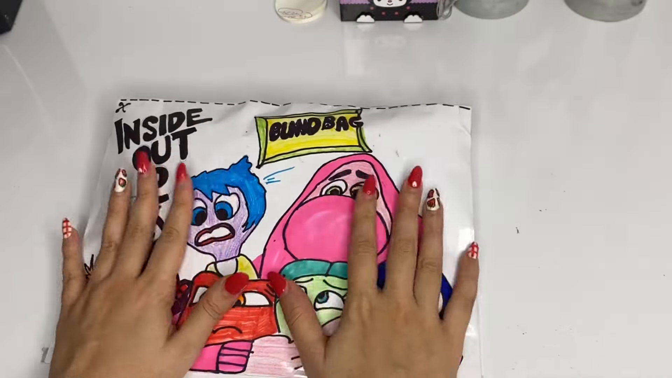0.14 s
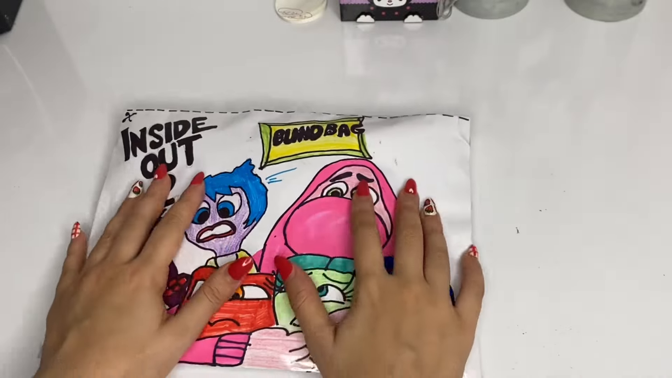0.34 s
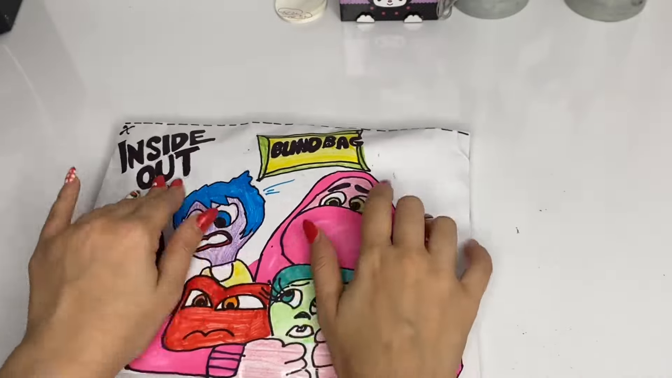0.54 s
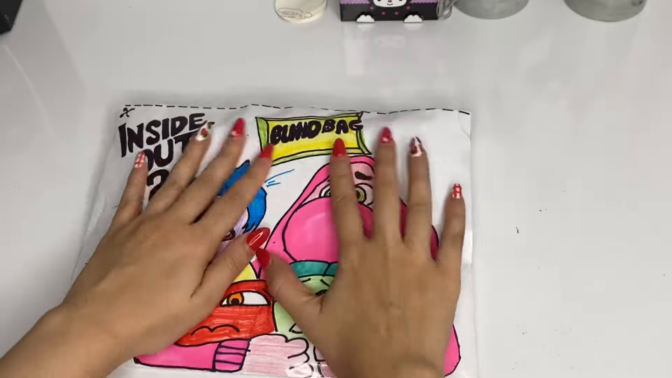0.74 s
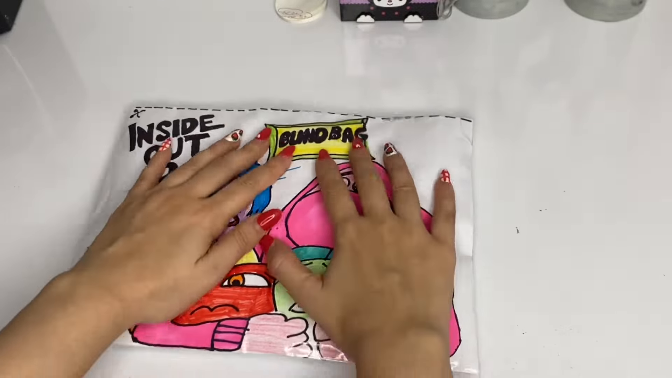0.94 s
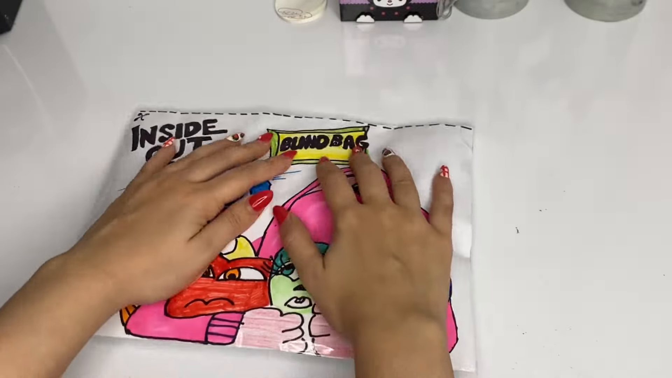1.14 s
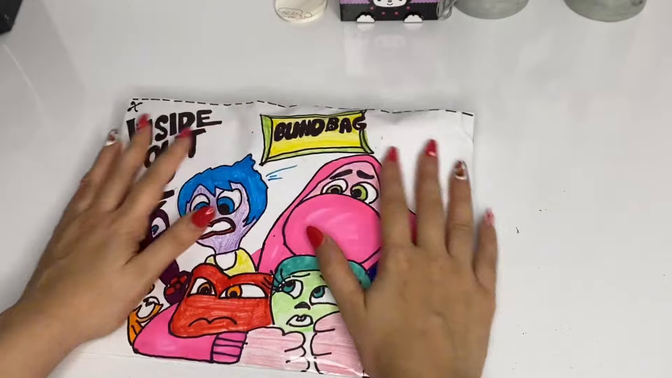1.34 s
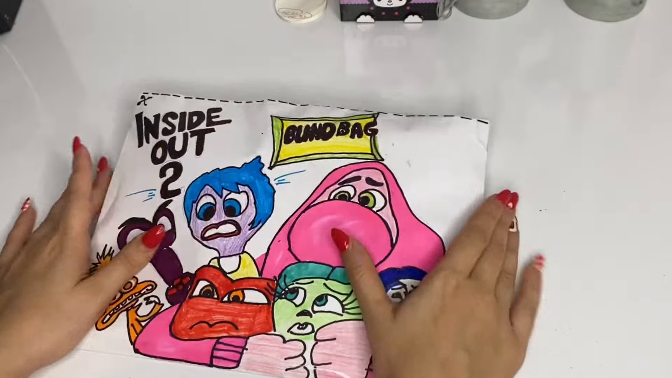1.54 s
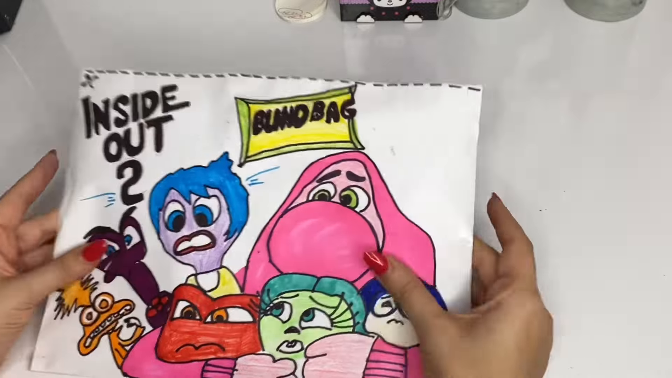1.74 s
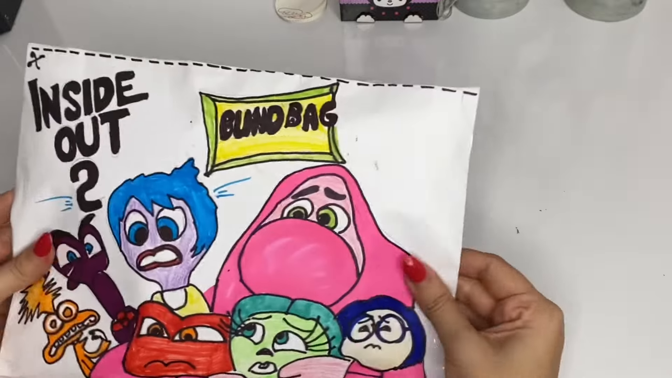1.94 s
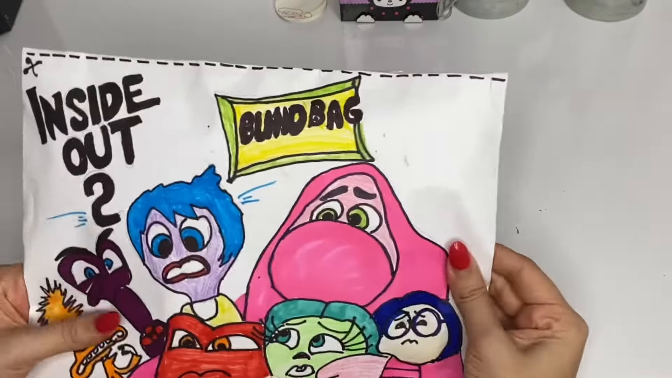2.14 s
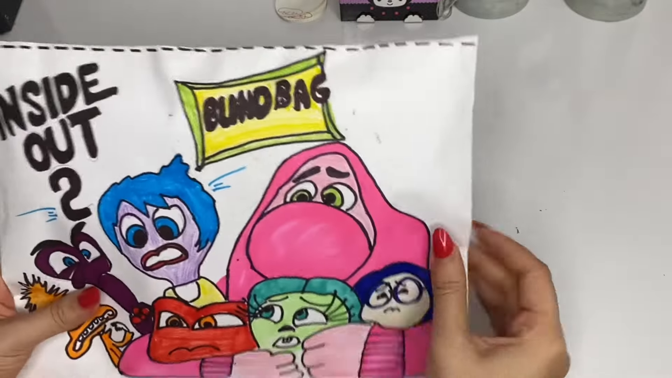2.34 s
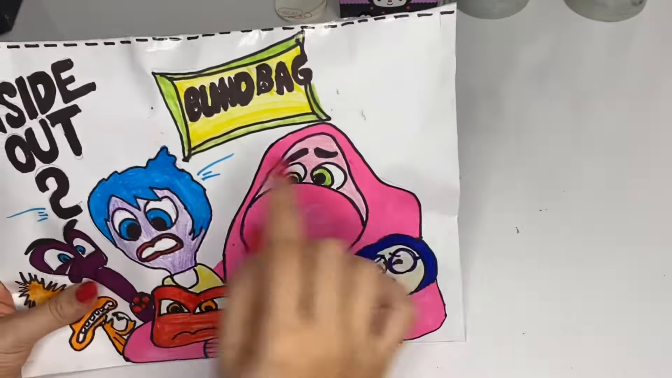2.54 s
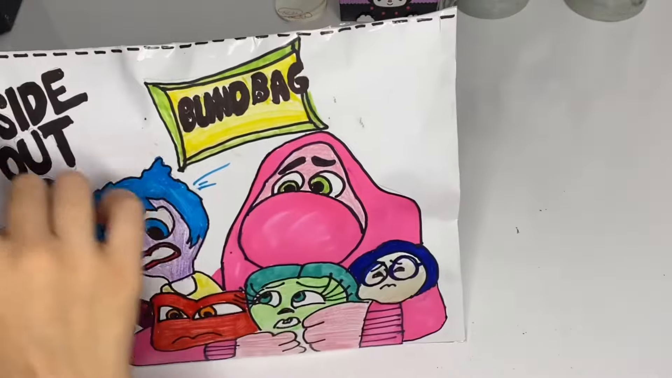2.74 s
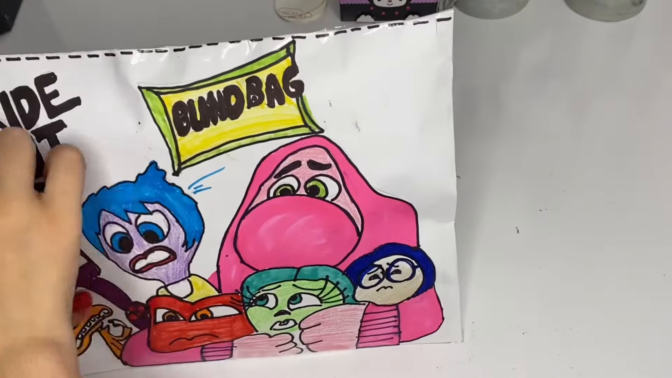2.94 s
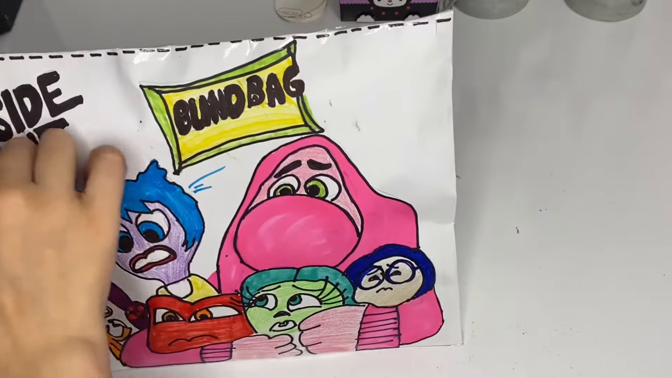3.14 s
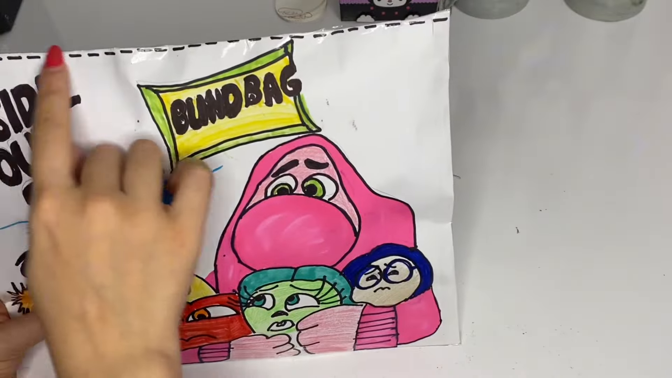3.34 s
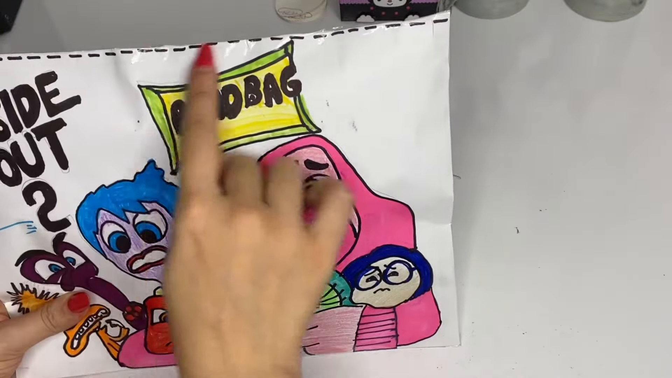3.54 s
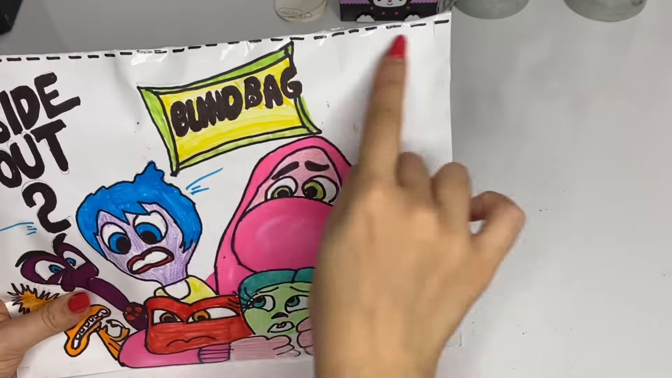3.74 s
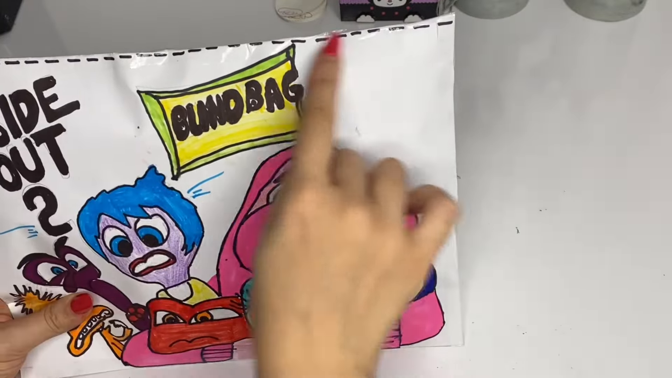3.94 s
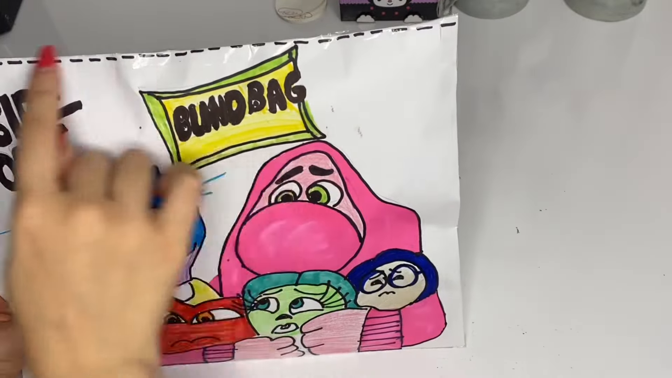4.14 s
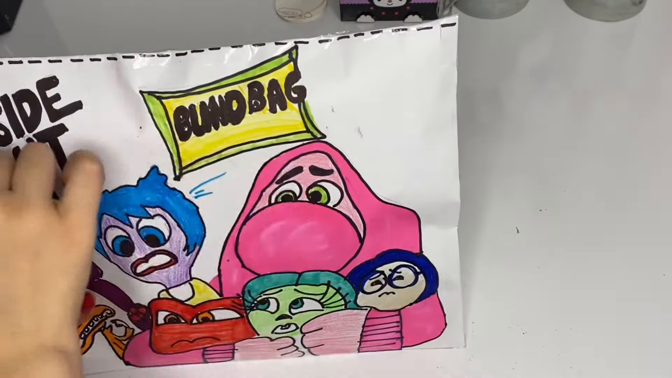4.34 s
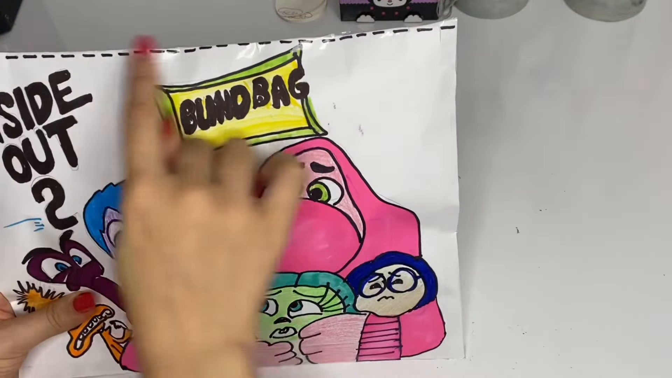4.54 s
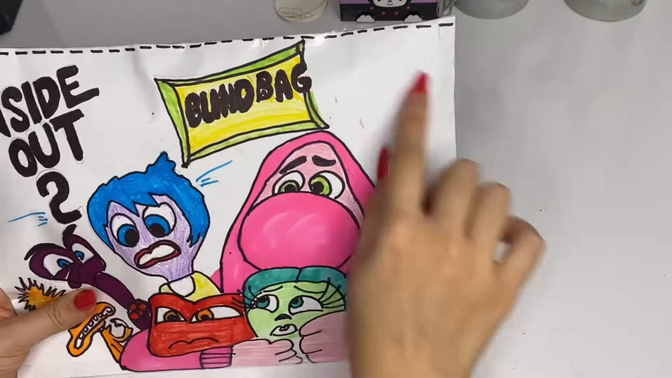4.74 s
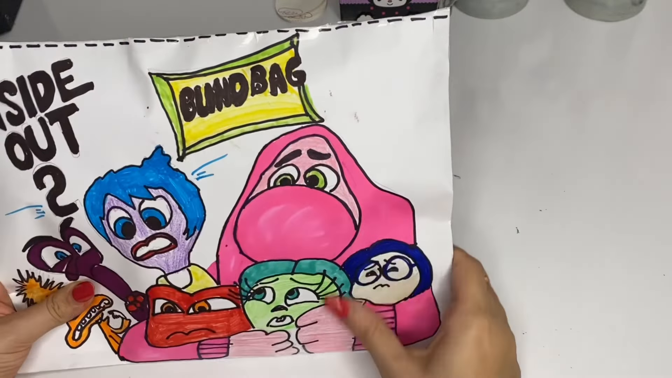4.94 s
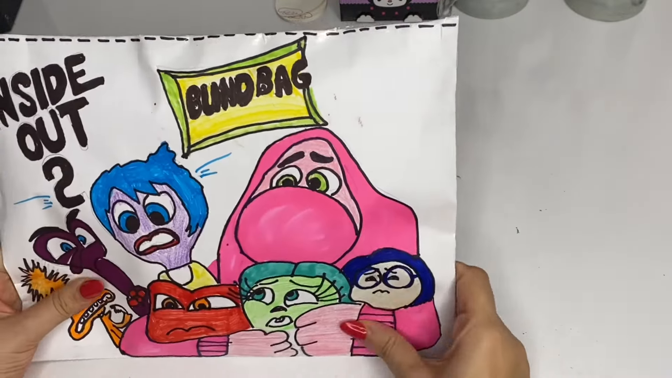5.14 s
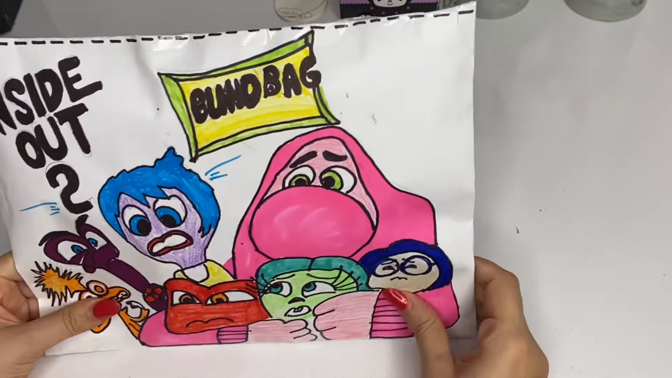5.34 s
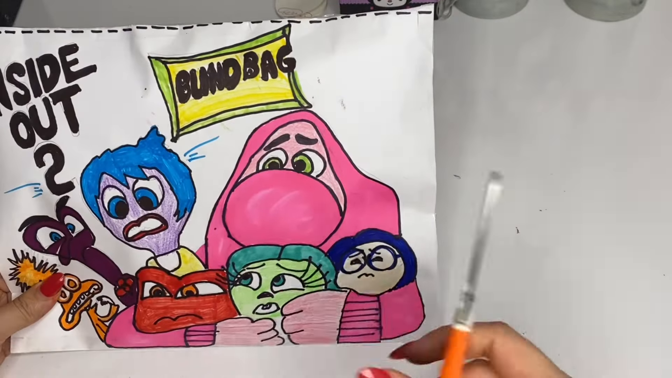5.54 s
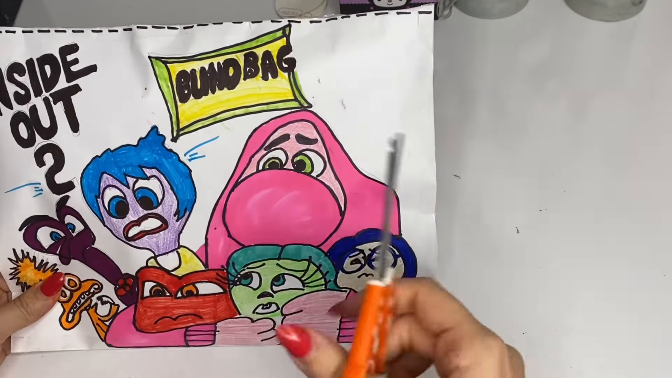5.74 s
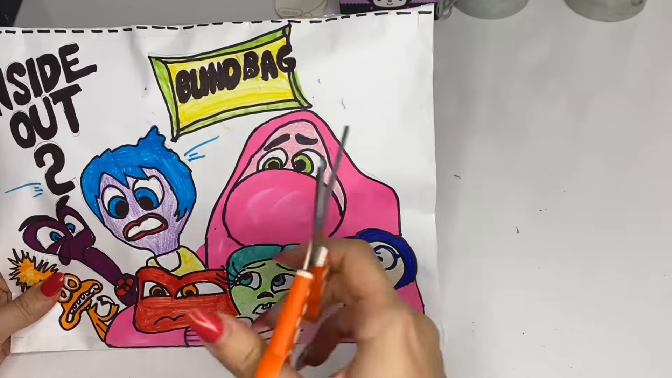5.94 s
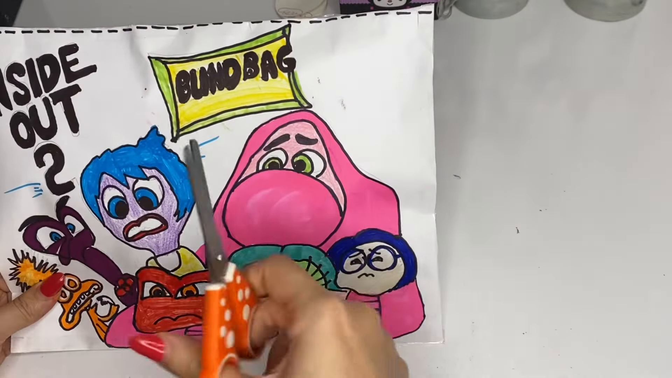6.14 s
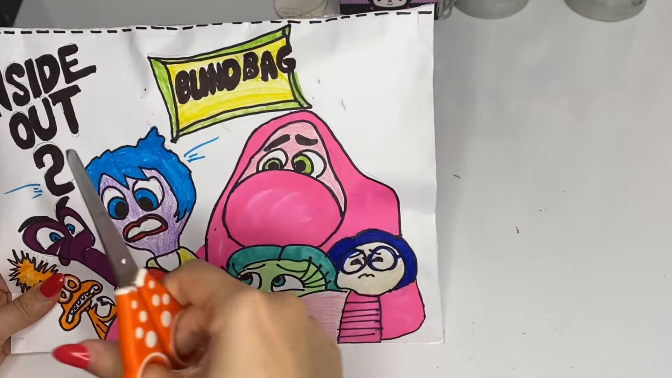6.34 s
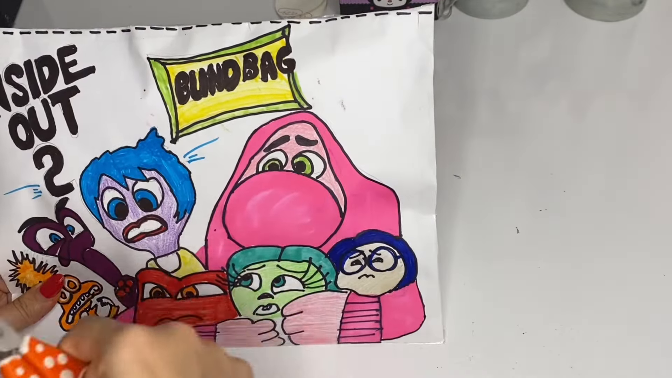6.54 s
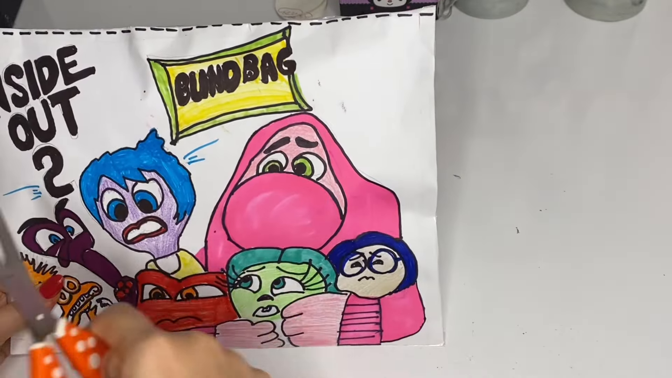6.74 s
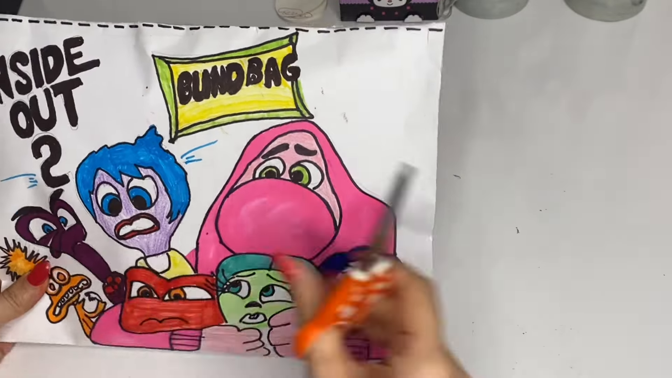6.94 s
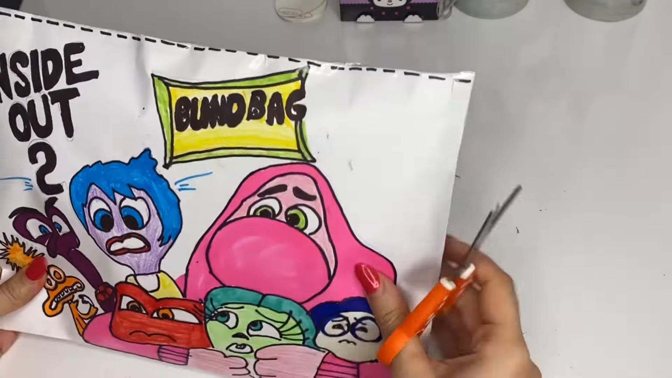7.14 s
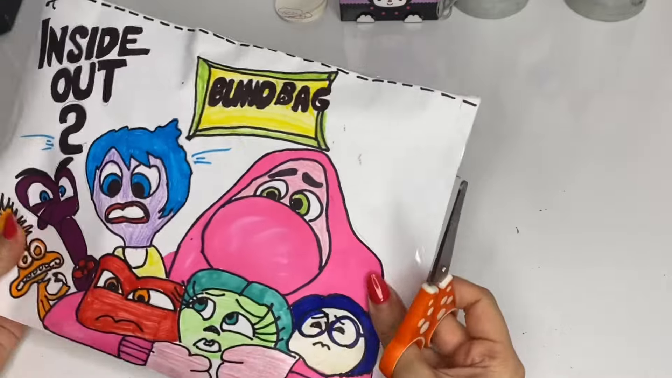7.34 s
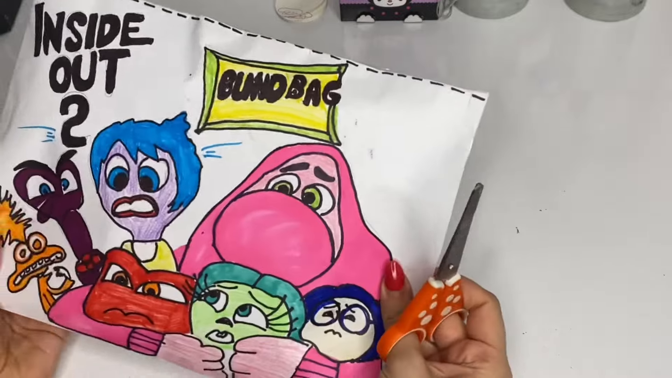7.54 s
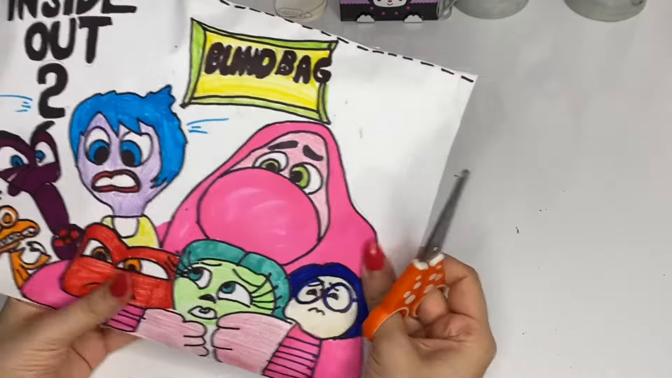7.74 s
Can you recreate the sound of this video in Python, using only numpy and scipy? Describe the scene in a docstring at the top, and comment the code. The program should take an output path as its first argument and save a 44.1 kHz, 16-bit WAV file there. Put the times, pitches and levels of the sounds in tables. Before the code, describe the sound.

Close, dry paper crinkles with sharp creases, soft hollow thuds and finger swishes, followed by six light metallic scissor snips and a last rustle.

```python
"""Paper bag and scissors.

Hands smooth, lift and turn a paper bag in a small room, close to a pair of microphone ports.
Creases snap as short noise bursts over a fine crackle of tiny grains; fingers hiss as filtered noise.
The hollow bag thuds as falling sine modes; later, scissors snip six times with clicks and a steel scrape."""
import sys
import numpy as np
from scipy import signal
from scipy.fft import rfft, irfft, next_fast_len
from scipy.io import wavfile
from scipy.ndimage import uniform_filter1d, map_coordinates

SR = 44100
rng = np.random.default_rng(int(sys.argv[2]) if len(sys.argv) > 2 else 0)


def store_wav(level_fs):
    """Save 16-bit WAV to argv[1]."""
    pcm = np.round(np.clip(np.atleast_2d(level_fs), -1, 1) * 32767)
    wavfile.write(sys.argv[1], SR, pcm.T.astype(np.int16))


N = 343539
TIME = np.arange(N) / SR  # seconds


def amp(db):
    """Decibels to gain."""
    return 10 ** (np.asarray(db) / 20)


def unit(x):
    """Scales to rms 1."""
    return x / np.sqrt(np.mean(x ** 2) + 1e-20)


def read(points, hz):
    """Interpolates a table on a logarithmic frequency axis."""
    f, value = np.transpose(points)
    return np.interp(np.log(hz + 1), np.log(f + 1), value)


def curve(rows):
    """Turns rows of seconds and dB into a gain at every sample."""
    return amp(np.interp(TIME, *np.transpose(rows)))


def add(mix, start_s, sound):
    """Mixes a stereo sound in at start_s."""
    part = mix[:, max(round(start_s * SR), 0):][:, :sound.shape[1]]
    part += sound[:, :part.shape[1]]


def colour(x, spectrum):
    """Filters by a spectrum table."""
    size = next_fast_len(x.shape[-1])
    gain = amp(read(spectrum, np.fft.rfftfreq(size, 1 / SR)))
    return irfft(rfft(x, size) * gain, size)[..., :x.shape[-1]]


def pan(left_db):
    """Left and right gains of constant power, left_db apart."""
    return unit(amp([[left_db / 2], [-left_db / 2]]))


def noise():
    """Stereo white noise over the whole scene, the channels unrelated."""
    return rng.standard_normal((2, N))


def flutter(per_s, depth_db):
    """A gain that wanders at random between 4096 knots, then holds."""
    knots = rng.standard_normal(4096)
    return amp(depth_db * np.interp(TIME * per_s, np.arange(len(knots)), knots))


def drifting(x, depth_db, span_hz, span_s):
    """Broad resonances come and go as the point of contact moves."""
    hz, frame_s, z = signal.stft(x, SR, nperseg=512)
    knots = rng.standard_normal((256, 512))
    grid = np.meshgrid(hz / span_hz, frame_s / span_s, indexing="ij")
    field = map_coordinates(knots, grid, order=3, mode="mirror")
    return signal.istft(z * amp(depth_db * field), SR, nperseg=512)[1][:, :N]


# Likeness of the two ports. Each row: frequency in Hz, likeness from 0 to 1.
PORT_LIKENESS = [(50, 0.91), (200, 0.97), (500, 0.88), (1500, 0.4), (5000, 0.01), (9000, 0.9), (16000, 0.7)]


def ports(pair, lag_s=0):
    """Makes two unrelated signals partly alike, the right one arriving lag_s earlier."""
    size = next_fast_len(pair.shape[1])
    hz = np.fft.rfftfreq(size, 1 / SR)
    left, other = rfft(pair, size)
    same = np.clip(read(PORT_LIKENESS, hz), 0, 1)
    right = same * left + np.sqrt(1 - same ** 2) * other
    right = right * np.exp(2j * np.pi * hz * lag_s)
    return irfft(np.array([left, right]), size)[:, :pair.shape[1]]


def burst(spectrum, rise_s, decay_s, lag_s=0, size=2048, lead_samples=192, smooth_bins=81):
    """A few ms of dense ringing, with the energy of 5 ms at rms 1, that swells around lead_samples."""
    t = (np.arange(size) - lead_samples) / SR
    shape = np.exp(-np.logaddexp(-t / rise_s, t / decay_s))
    z = rfft(rng.standard_normal((2, size)) * shape)
    # one sudden release feeds all pitches alike, so broad holes are evened out
    z /= np.sqrt(uniform_filter1d(np.abs(z) ** 2, smooth_bins, axis=1) + 1e-20)
    x = colour(ports(irfft(z, size), lag_s), spectrum)
    return x / np.sqrt((x ** 2).sum(1, keepdims=True) / (.005 * SR))


# Modes of the struck panel. Each row: multiple of its pitch, relative level in dB per Hz before focus.
PANEL_KNOCK = [(.12, -19.5), (.36, -9), (.6, -9.5), (.8, -2.5), (1, 1.5), (1.25, -4), (1.7, -11.5),
               (2.8, -31), (6, -56.5)]
# Crack spectrum. Each row: frequency in Hz, relative level in dB per Hz.
CRACK_SPECTRUM = [(300, -31.5), (700, -6.5), (1050, -3.5), (1600, 4), (2600, -3), (3600, -11.5),
                  (7000, -47.5), (16000, -48.5)]


def clicks(rows, treble, knock_s, crack_s, treble_s, rise_s, lead_s, octave_db, side_db, scatter_db):
    """Each click sums a knock of the panel, a crack and a treble tick, each with its own decay."""
    out = np.zeros((2, N))
    for s, db, knock_db, treble_db, panel_hz in rows:
        lag_s = rng.normal(0, .00006)  # the low parts spread from all over the surface
        # a soft, dull knock is mostly the panel's main mode; a sharp one shakes all of them
        focus = np.clip(knock_db / 9, 1, 2.2)
        panel = np.array(PANEL_KNOCK) * [panel_hz, focus]
        # a gentler release is slower: its treble is lower as well as weaker
        tick_spectrum = np.array(treble) * [2 ** (min(treble_db, 0) / octave_db), 1]
        knock = amp(knock_db) * burst(panel, rise_s, knock_s, lag_s)
        crack = burst(CRACK_SPECTRUM, rise_s, crack_s, lag_s)
        tick = amp(treble_db) * burst(tick_spectrum, rise_s, treble_s)
        # brighter clicks lean further to the left
        left_db = side_db + .35 * treble_db + scatter_db * rng.standard_normal()
        add(out, s - lead_s, amp(db) * pan(left_db) * (knock + crack + tick))
    return out


# Loudest creases. Each row: time in seconds, crack level in dB before the trim, knock re crack in dB,
# treble re crack in dB, panel pitch in Hz.
CREASE_SNAPS = [(0.0135, -48.5, 0.5, -16, 694), (0.0775, -56, 21, -6, 830), (0.092, -53.5, 8.5, -15.5, 620),
                (0.1465, -49.5, 3, -11.5, 800), (0.1614, -41.5, 3.5, -4, 726), (0.1787, -39.5, 5.5, 0, 870),
                (0.1964, -34.5, 1.5, 5, 746), (0.2682, -51, 3.5, 4.5, 700), (0.2864, -40, -6.5, -15, 694),
                (0.3440, -38.5, 1.5, 4.5, 950), (0.3568, -31, 2.5, 0, 910), (0.400, -45, 4.5, -13, 700),
                (0.4358, -34.5, -3.5, -8.5, 830), (0.5103, -44, 5, -10, 640), (0.5365, -44, 0.5, -12, 895),
                (0.5494, -40, 0, -10, 810), (0.5578, -40.5, 2.5, -7, 830), (0.5888, -47.5, 6, -7, 776),
                (0.667, -47.5, 4, -9, 710), (0.698, -32, -1.5, -5.5, 827), (0.7114, -34.5, 0.5, -8, 830),
                (0.8445, -38.5, 3, -3.5, 830), (0.8619, -43.5, 7, -15.5, 790), (0.9078, -44, 3.5, 6.5, 870),
                (0.9182, -44, -7.5, 6.5, 680), (0.9396, -27, -2.5, 6, 614), (0.9822, -31, 0.5, -8, 582),
                (1.004, -41, 4.5, 3.5, 547), (1.0365, -37, -8.5, -17.5, 675), (1.075, -54.5, 3, 0.5, 700),
                (1.1371, -29.5, -4.5, 1.5, 686), (1.1851, -42, -12, 12.5, 750),
                (1.2115, -40.5, -1, -8.5, 633), (1.2208, -40, -6, -5, 750), (1.2308, -33, -6.5, -5.5, 830),
                (1.2635, -37, 8, -3, 650), (1.2977, -31.5, 3, -2.5, 680), (1.3045, -30.5, -2.5, -2, 740),
                (1.326, -31.5, -0.5, -2.5, 670), (1.3345, -29.5, -5, -7.5, 624),
                (1.4335, -40, -8.5, -2, 704), (1.4435, -34.5, -9, 2, 650), (1.4912, -38, 0, -20, 700),
                (1.580, -51, 3.5, 5.5, 615), (1.6285, -36, -11.5, 2.5, 820), (1.6395, -33, -1, -16.5, 850),
                (1.6470, -29, 3, -5, 900), (1.6685, -43, 13.5, -1.5, 664), (1.7502, -36.5, 2.5, -2, 770),
                (1.7684, -35, 8, -3, 810), (1.7767, -38, 7.5, 1.5, 655), (1.8182, -36, 2.5, 6.5, 850),
                (1.847, -45.5, 3, -6, 800), (1.8992, -47, 2.5, -13, 800), (1.9355, -46.5, 4.5, -10, 846),
                (1.96, -32.5, 1.5, 1.5, 900), (2.0049, -40, -4, -5, 900), (2.1219, -48.5, 9.5, -4.5, 797),
                (2.150, -52.5, 9.5, -12, 850), (2.1858, -34.5, 2.5, -2, 950),
                (2.196, -43.5, 12.5, -15.5, 673), (2.288, -49.5, 4, -14, 900),
                (2.3018, -37.5, 4.5, -2, 1003), (2.3921, -49.5, -4, -10.5, 540), (2.483, -62, 9, -15, 900),
                (2.5054, -61, 11, -16, 636), (2.5818, -38, -1, -4, 678), (2.6441, -50.5, 3.5, -1.5, 647),
                (2.6895, -61.5, 14, -4, 647), (2.99, -68, 16.5, -10, 738), (3.2995, -73.5, 25, -8.5, 620),
                (3.5038, -53, -1, -2, 620), (3.5758, -31, 6.5, -4, 740), (3.614, -48, 6, -5, 800),
                (3.7114, -43, 3, -18, 520), (3.747, -33, -8.5, -2.5, 790), (3.8355, -47, -17.5, -13, 845),
                (3.8779, -26, -2, -2.5, 802), (4.0368, -38.5, 9, -19.5, 770), (4.154, -71, 18.5, -2, 740),
                (4.303, -64, 4, -2.5, 698), (4.428, -65.5, 1, 15, 705), (4.458, -54, 15.5, -7, 575),
                (4.5332, -41, 4, -3, 435), (4.5625, -42.5, 9, -1, 656), (4.572, -45.5, 4, -7, 600),
                (4.6013, -38.5, 5.5, 0.5, 593), (4.6192, -28, 7, -10.5, 620), (4.7224, -39, 2, -10.5, 780),
                (4.7395, -28.5, -0.5, -13, 896), (4.815, -51, 4, -11, 556), (4.8887, -62.5, 15.5, -7, 830),
                (5.0515, -35.5, 1.5, -11, 880), (5.081, -52, 9, -8.5, 640), (5.1262, -50.5, 3.5, -7, 616),
                (5.1902, -41.5, 1.5, -5.5, 890), (5.2965, -54.5, 8, -1.5, 620), (5.4242, -49, 4.5, -1, 650),
                (6.905, -57.5, 4.5, -1, 860), (6.953, -49.5, -5, -7.5, 690), (6.975, -57.5, 17, -13, 750),
                (7.1725, -53.5, 20.5, -1, 834), (7.2446, -47.5, 6, -8.5, 626), (7.2785, -48.5, 6, -16, 670),
                (7.3043, -37.5, -4, -10.5, 676), (7.3118, -41, 2.5, 4, 610), (7.3666, -24, -3.5, -6.5, 760),
                (7.400, -50.5, -3, 7, 700), (7.4842, -65, 15, -7, 780), (7.7346, -30.5, 2, -1.5, 920),
                (7.7861, -34, 9, 8.5, 970)]
# Paper treble. Each row: frequency in Hz, relative level in dB per Hz.
PAPER_TREBLE = [(1200, -38), (2300, -18), (3000, 4), (5200, 2.5), (7000, -4), (10000, -8), (16000, -24.5)]


def snapping():
    """Creases release suddenly and knock the paper panels around them."""
    return amp(-1.0) * clicks(CREASE_SNAPS, PAPER_TREBLE, knock_s=0.003, crack_s=0.0015, treble_s=0.0019,
                              rise_s=0.00058, lead_s=.0036, octave_db=35.5, side_db=2.5, scatter_db=3.0)


# Hands smooth the bag, grip and lift it, trace its top edge, change grip, then turn it to the scissors.
# Each row: start, speeding up, steady and slowing in seconds, then skin hiss and paper crackle in dB
# at full speed, before the trims.
HAND_MOVES = [ (-0.1, 0.31, 0.028, 0.21, -58, -46.5), (0.32, 0.018, 0.22, 0.15, -56, -48.5),
              (0.56, 0.12, 0.011, 0.2, -49, -44.5), (0.83, .12, 0.029, 0.19, -55.5, -43),
              (1.12, 0.086, 0.086, 0.37, -43, -37.5), (1.56, 0.065, 0.028, 0.14, -53, -44.5),
              (1.72, 0.022, 0.063, 0.26, -54, -46), (1.84, 0.095, 0.093, 0.066, -62, -52.5),
              (2.0, 0.091, 0.012, 0.1, -53.5, -60.5), (2.14, 0.048, 0.052, 0.28, -64.5, -49.5),
              (2.558, 0.027, 0.033, 0.11, -82, -58.5), (2.93, 0.048, 0.011, 0.053, -76, -60),
              (2.98, 0.51, 0.21, 0.13, -54.5, -59.5), (3.672, .012, .04, 0.042, -69.5, -48.5),
              (3.81, 0.063, 0.16, 0.12, -56, -63), (4.26, 0.32, 0.18, 0.18, -53, -52),
              (4.91, 0.03, 0.17, 0.223, -62.5, -53.5), (5.15, 0.096, 0.017, 0.22, -58, -63),
              (5.34, 0.044, 0.078, 0.052, -66, -56), (6.8, 0.072, 0.25, 0.13, -68.5, -62.5),
              (7.14, 0.11, 0.047, 0.47, -54, -50.5), (7.541, 0.12, 0.11, .1, -48.5, -57)]
EASE = 1.71  # loudness grows as this power of the hand's speed


def hands():
    """Movements speed up, hold and slow; returns levels for sliding skin and for worked paper."""
    power = np.zeros((2, N))
    for start, rise_s, hold_s, fall_s, hiss_db, crackle_db in HAND_MOVES:
        corners = start + np.cumsum(np.abs([0, rise_s, hold_s, fall_s]))
        moving = (TIME > corners[0]) & (TIME < corners[-1])
        speed = np.interp(TIME[moving], corners, [0, 1, 1, 0])
        power[:, moving] += (amp([[hiss_db], [crackle_db]]) * speed ** EASE) ** 2
    return np.sqrt(power)


TINT_DB = 6  # standard deviation of each grain's own colouring


def crackle(work, spectrum, per_s, spread_db, grain_s, kinds=40):
    """Tiny creases ring briefly, each kind at its own pitch; hard work makes them crowd together."""
    chance, size, kind = rng.random(N), rng.exponential(1, N), rng.integers(0, kinds, N)
    crowding = np.clip(work / amp(-46), 1, 1.5)
    happens = chance < per_s * crowding / SR
    train = happens * amp(spread_db * np.minimum(size, 2.1)) / np.sqrt(crowding)
    hz, db = np.transpose(spectrum)
    tints = TINT_DB * rng.standard_normal((kinds, len(hz)))
    grains = []
    for scale, tint in zip(np.geomspace(.6, 1.6, kinds), tints):
        tinted = np.transpose([hz * scale, db + tint])
        grains.append(burst(tinted, grain_s / 4, grain_s, rng.normal(0, .00012)))
    out = np.zeros((2, N))
    for at in np.flatnonzero(train):
        add(out, at / SR, train[at] * grains[kind[at]])
    return unit(out) * work


# Crease spectrum before pitch scaling and tint. Each row: frequency in Hz, relative level in dB per Hz.
CREASE_SPECTRUM = [(100, -27.5), (270, -1.5), (400, -0.5), (620, 3), (900, 1), (1700, -6), (2800, -15.5),
                   (5000, -19.5), (8000, -31), (16000, -45)]
# Uneven breaking of stiff paper: wanderings per second, depth in dB.
CREASE_CLUMPS = (33, 1.6)


def creasing(work):
    """Stiff paper breaks unevenly under the hand."""
    uneven = work * flutter(*CREASE_CLUMPS)
    return amp(-3.0) * crackle(uneven, CREASE_SPECTRUM, per_s=240, spread_db=6.5, grain_s=.0011)


# Wrinkle spectrum before pitch scaling and tint. Each row: frequency in Hz, relative level in dB per Hz.
WRINKLE_SPECTRUM = [(300, -21.5), (1250, -8.5), (1700, 1.5), (2200, -6), (6000, -12), (16000, -30.5)]


def wrinkling(work, stroke):
    """Where a hand both presses and slides, wrinkles give way in a finer crackle."""
    both = np.sqrt(work * stroke)
    return amp(-9.0) * crackle(both, WRINKLE_SPECTRUM, per_s=210, spread_db=7.5, grain_s=.0008)


def bending(x, travel_s, crack_hz):
    """Bending waves cross the sheet faster the higher they are: the tick arrives first, the knock last."""
    size = next_fast_len(N + SR // 4)
    hz = np.fft.rfftfreq(size, 1 / SR)
    turns = travel_s * (2 * np.sqrt(crack_hz * hz) - hz)
    return irfft(rfft(x, size) * np.exp(-2j * np.pi * turns), size)[:, :N]


# Lasting resonances of the hollow bag. Each row: frequency in Hz, gain at resonance in dB re the sheet.
HOLLOW_MODES = [(245, -2), (559, -7.5), (611, -1), (860, -11.5), (1104, -10.5), (1265, -9.5), (1469, -9)]


def hollow(x, width_hz):
    """The sheet drives the lasting resonances of the bag."""
    t = np.arange(SR // 4) / SR
    modes = sum(amp(db) * np.cos(2 * np.pi * hz * t) for hz, db in HOLLOW_MODES)
    ring = modes * np.exp(-np.pi * width_hz * t) * 2 * np.pi * width_hz / SR
    return x + signal.oaconvolve(x, ring[None], axes=1)[:, :N]


# Skin on paper. Each row: frequency in Hz, relative level in dB per Hz.
SLIDE_SPECTRUM = [(300, -8.5), (1000, -6), (3700, -3.5), (4700, -2), (7000, -3), (10000, 0), (12000, -3.5),
                  (16000, -7)]


def sliding(stroke, grit_db, scratch_db):
    """Skin catches on paper fibres: a hiss and a scrape of shifting colour follow the hand's speed."""
    fibres = noise() * flutter(per_s=490, depth_db=grit_db) * flutter(per_s=40, depth_db=2.0)
    catches = noise() * flutter(per_s=700, depth_db=3) * flutter(per_s=30, depth_db=3)
    fibres = drifting(fibres, depth_db=1.8, span_hz=450, span_s=.09)
    catches = drifting(catches, depth_db=3.8, span_hz=420, span_s=.09)
    hiss = unit(colour(ports(fibres), SLIDE_SPECTRUM))
    scratch = amp(scratch_db) * unit(colour(ports(catches), PAPER_TREBLE))
    return amp(0.5) * pan(.4) * (hiss + scratch) * stroke


# Belly popping in or out. Each row: time in seconds, level in dB before thud_db, settled pitch in Hz,
# rise in seconds.
BELLY_THUDS = [(1.307, -32.5, 154.4, .005), (1.335, -31.5, 147.6, .005), (1.381, -28, 149.6, .003),
               (1.521, -32, 158, 0.0024), (2.189, -44, 180, .004), (2.502, -44.5, 137.7, .006),
               (2.539, -51.5, 153, 0.0045), (4.915, -31.5, 114.7, 0.015), (4.949, -34, 142.2, 0.0073),
               (7.17, -41.5, 138, .002), (7.209, -46.5, 165, 0.0017)]
# Swaying of the whole bag. Each row: time in seconds, level in dB before sway_db.
SWAY_LEVEL = [(0.0, -66), (0.06, -61), (1.02, -61), (1.19, -66.5), (1.34, -53), (2.13, -62), (2.75, -63),
              (2.84, -86.5), (2.93, -70), (3.55, -64.5), (4.25, -65.5), (5.03, -56), (5.16, -62),
              (5.47, -54.5), (5.53, -74.5), (6.79, -74), (7.62, -60.5), (7.79, -58.5)]
# Air pushed by the bag. Each row: frequency in Hz, relative level in dB per Hz.
SWAY_SPECTRUM = [(15, -47.5), (28, -28), (42, -4.5), (62, 6), (82, -5.5), (115, 4.5), (170, -7.5),
                 (260, -8), (450, -29), (1000, -57)]


def flexing(ring_s, thud_db, sway_db, sharp, settle_s, push_db, push_s):
    """The bag pushes air as it sways, and booms briefly when its belly pops."""
    out = amp(sway_db) * unit(colour(ports(noise()), SWAY_SPECTRUM)) * curve(SWAY_LEVEL)
    t = np.arange(SR // 4) / SR
    for s, db, hz, rise_s in BELLY_THUDS:
        # the taut face starts sharp and sinks as it slackens; its highest mode dies soonest
        turn = 2 * np.pi * np.cumsum(hz * (1 + sharp * np.exp(-t / settle_s))) / SR
        belly = np.sin(turn) + 0.29 * np.sin(0.72 * turn) + 0.2 * np.sin(1.2 * turn)
        push = amp(push_db) * np.sin(1.77 * turn) * np.exp(-t / push_s)
        boom = (belly * np.exp(-t / ring_s) + push) * (1 - np.exp(-t / rise_s))
        add(out, s, amp(db + thud_db) * np.array([boom, boom]))
    return out * pan(-2.0)


# Blades meeting. Each row: time in seconds, crack level in dB before the trims.
BLADE_SHUTS = [(5.5745, -49), (5.799, -48), (6.031, -46), (6.2721, -50.5), (6.481, -46.5), (6.8106, -48.5)]
# Shared by every snip: knock re crack in dB, treble re crack in dB, pivot pitch in Hz.
SNIP_CLICK = (-6.5, 7.9, 840)
# Blade treble. Each row: frequency in Hz, relative level in dB per Hz.
BLADE_TREBLE = [(1200, -27), (2500, 2), (3200, -5), (3800, 8), (4800, 7), (5700, 0.5), (7200, -2.5),
                (10500, -4.5), (16000, -14)]


def snipping():
    """Blades clack together and knock the pivot."""
    rows = [(*row, *SNIP_CLICK) for row in BLADE_SHUTS]
    return amp(3.0) * clicks(rows, BLADE_TREBLE, knock_s=0.0062, crack_s=0.0022, treble_s=0.0014,
                             rise_s=0.00018, lead_s=.0038, octave_db=36, side_db=0.5, scatter_db=-2.0)


# Blades parting. Each row: time in seconds, level in dB.
BLADE_OPENS = [(5.677, -57), (5.903, -55.5), (6.156, -56.5), (6.379, -65.5), (6.622, -58.5), (7.167, -52)]
# Steel on steel. Each row: frequency in Hz, relative level in dB per Hz.
STEEL_SPECTRUM = [(500, -15), (1500, -14), (3000, -11), (4200, -4.5), (5800, -4), (7100, 1), (8400, -4),
                  (10000, 0), (11600, -3.5), (13200, -5), (14800, -10), (16000, -7.5)]


def blades(closing_db, swell_s, opening_s):
    """Steel slides on steel: a scrape swells until the blades meet; they part with a tick and a swish."""
    level = np.zeros(N)
    for s, db in BLADE_SHUTS:
        t = TIME - s + 0.0027
        level += amp(db + closing_db) * np.exp(-np.abs(t) / np.where(t < 0, swell_s, .007))
    for s, db in BLADE_OPENS:
        t = np.maximum(TIME - s, 0)
        tick = np.exp(-t / 0.0064)
        swish = np.exp(-((t - opening_s) / 0.018) ** 2)
        level += amp(db) * (t > 0) * (tick + swish)
    scrape = noise() * flutter(per_s=300, depth_db=4)
    scrape = drifting(scrape, depth_db=3, span_hz=300, span_s=.15)
    return level * unit(colour(ports(scrape), STEEL_SPECTRUM)) * pan(2.0)


# Reverberation. Each row: frequency in Hz, 60 dB decay time in seconds.
ROOM_T60 = [(150, 0.62), (600, 0.21), (2000, 0.18), (5000, 0.18), (10000, 0.12), (16000, 0.24)]


def room(x, wet_db, early_db, early_s, absorb_db, patterns=4):
    """Quick reflections off the table and hands, then the short tail of the room; both lose treble."""
    t = np.arange(SR // 2) / SR
    out = np.zeros((2, N))
    for k in range(patterns):
        taps = rng.standard_normal((2, len(t))) * (1 - np.exp(-(t / 0.0087) ** 2))
        hz, frame_s, z = signal.stft(taps, SR, nperseg=256)
        decay = amp(-60 * frame_s / read(ROOM_T60, hz)[:, None])
        tail = signal.istft(z * decay, SR, nperseg=256)[1][:, :len(t)]
        early = rng.standard_normal((2, len(t))) * (t > .002) * np.exp(-t / early_s)
        response = (amp(wet_db) * unit(tail) + amp(early_db) * unit(early)) / np.sqrt(len(t))
        # the hands keep moving, so one pattern of reflections gives way to the next
        share = np.maximum(np.cos(2 * np.pi * (TIME - k / patterns)), 0)
        out += signal.oaconvolve(x * share, response, axes=1)[:, :N]
    return x + colour(out, [(5000, 0.0035), (12000, absorb_db)])


# Quiet air. Each row: frequency in Hz, relative level in dB per Hz.
AIR_SPECTRUM = [(15, -23.5), (28, -19.5), (50, -1.5), (100, 0), (220, -17), (450, -19), (1000, -27),
                (4000, -31.5), (10000, -36.5), (16000, -50.5)]


def quiet_air():
    """Steady filtered noise under everything."""
    return amp(-75.5) * unit(colour(ports(noise()), AIR_SPECTRUM))


# The paper, skin hiss and bag sounds dip abruptly and briefly before the scissors start. Each row: time in
# seconds, gain in dB.
HANDLING_DIP = [(5.479, 0), (5.483, -22), (5.53, 0)]


def scene():
    """Paper and scissors in the room, over its quiet air."""
    stroke, work = hands()
    sheet = snapping() + creasing(work) + wrinkling(work, stroke)
    paper = hollow(bending(sheet, travel_s=.0013, crack_hz=2510), width_hz=17)
    paper = room(paper, wet_db=-8.5, early_db=-7.5, early_s=0.017, absorb_db=-8.0)
    hiss = sliding(stroke, grit_db=2.0, scratch_db=-6.5)
    body = flexing(ring_s=0.033, thud_db=1.5, sway_db=5.0, sharp=0.2, settle_s=.016,
                   push_db=-1.5, push_s=0.0074)
    scissors = snipping() + blades(closing_db=-2.5, swell_s=0.016, opening_s=0.02)
    scissors = room(scissors, wet_db=-7.5, early_db=-9.5, early_s=0.0044, absorb_db=-3.0)
    return (paper + hiss + body) * curve(HANDLING_DIP) + scissors + quiet_air()


# Lead of the left port over the right. Each row: frequency in Hz, phase in radians.
PORT_LEAD = [(150, 0), (950, 1), (1800, 0.04), (3360, 3), (5000, 1.5), (7150, 1), (8100, -5.5),
             (8850, -2.5), (9750, -6), (11800, -6.5), (12500, -9), (14100, -9.5), (14700, -11.5)]
EDGE_HZ = 16000


def record(dry):
    """The ports differ in phase by frequency; a low-pass then limits the band."""
    size = next_fast_len(N)
    left, right = rfft(dry, size)
    right = right * np.exp(-1j * read(PORT_LEAD, np.fft.rfftfreq(size, 1 / SR)))
    pair = irfft(np.array([left, right]), size)[:, :N]
    low_pass = signal.firwin(511, EDGE_HZ, window=("kaiser", 9), fs=SR)
    return signal.oaconvolve(pair, low_pass[None], "same")


dry = scene()
out = record(dry)
store_wav(out)
```